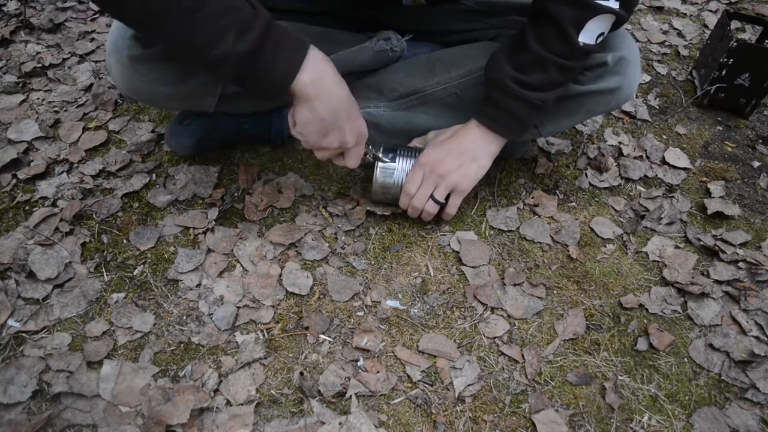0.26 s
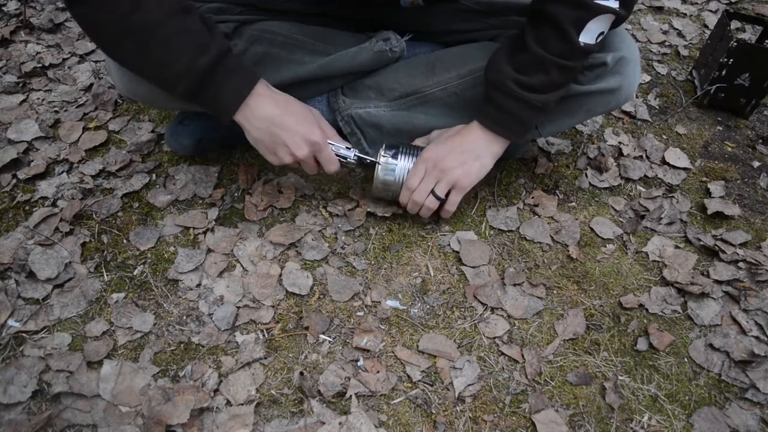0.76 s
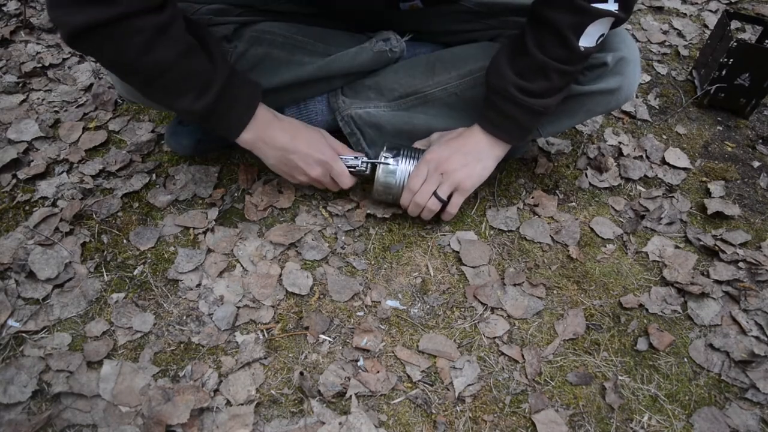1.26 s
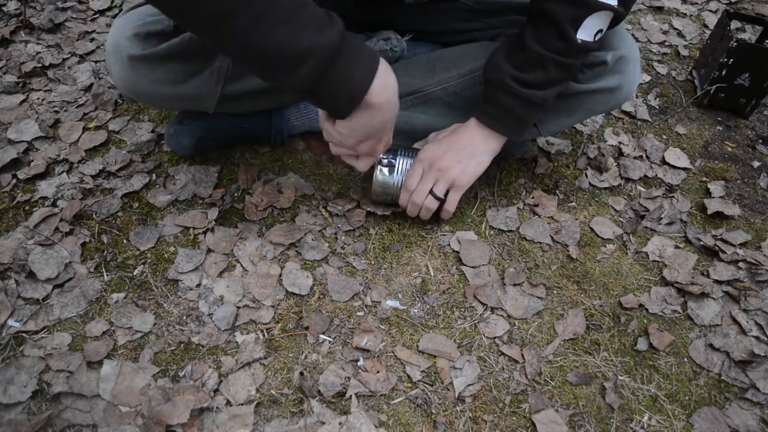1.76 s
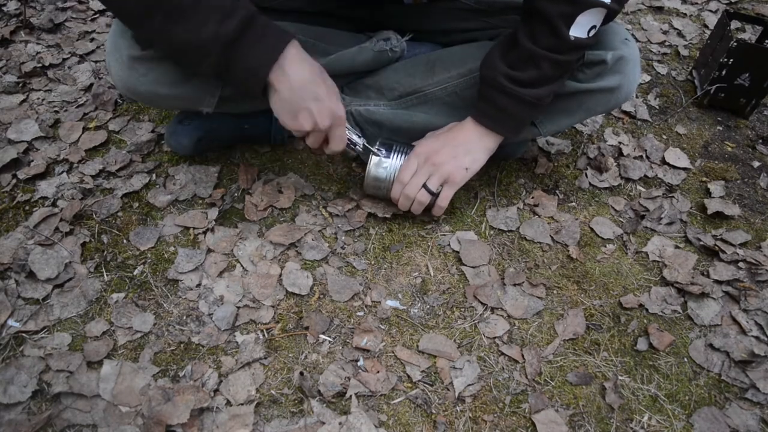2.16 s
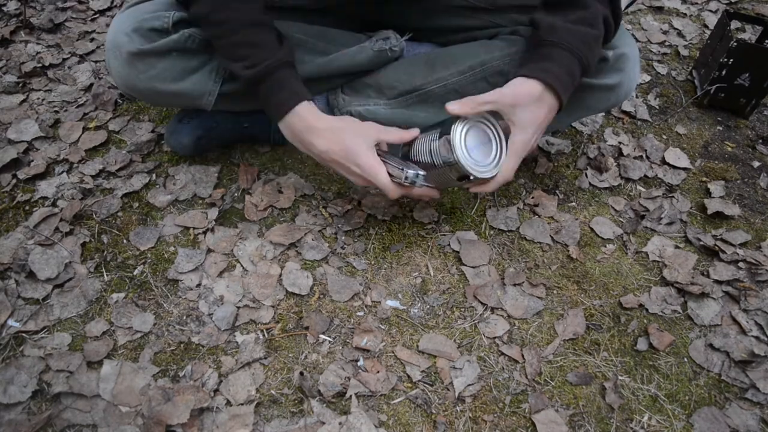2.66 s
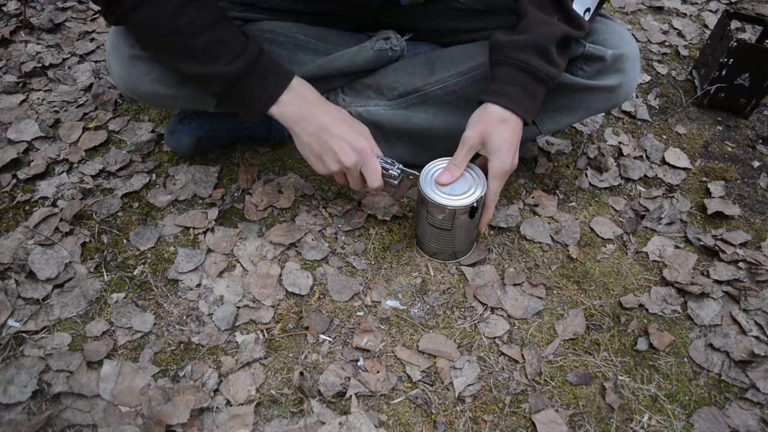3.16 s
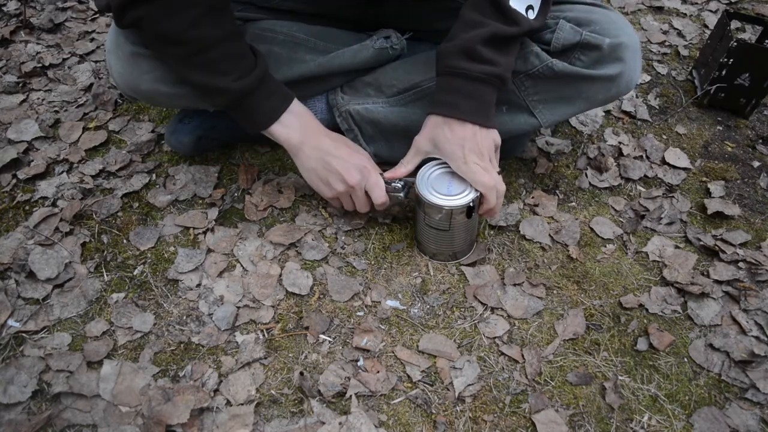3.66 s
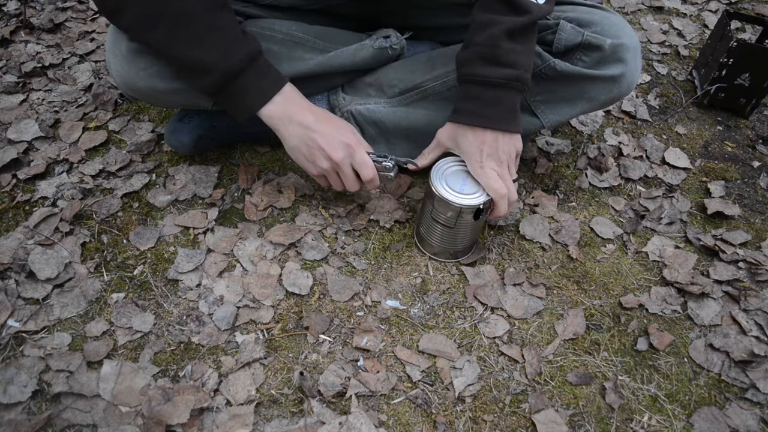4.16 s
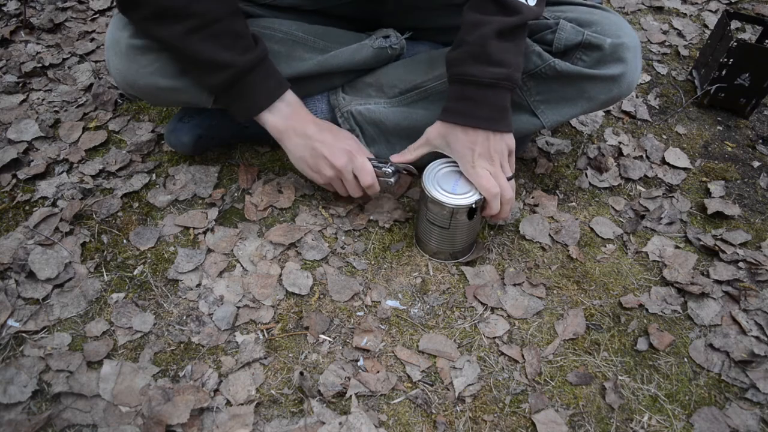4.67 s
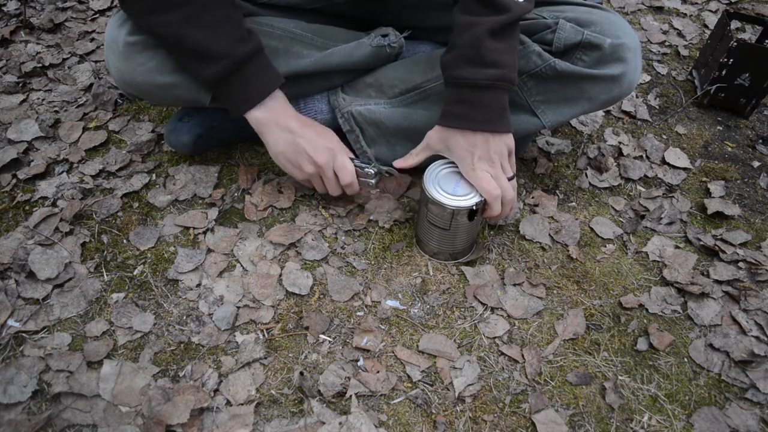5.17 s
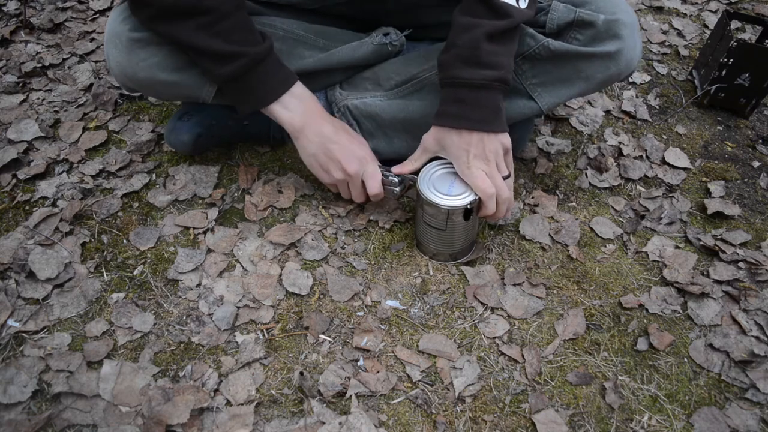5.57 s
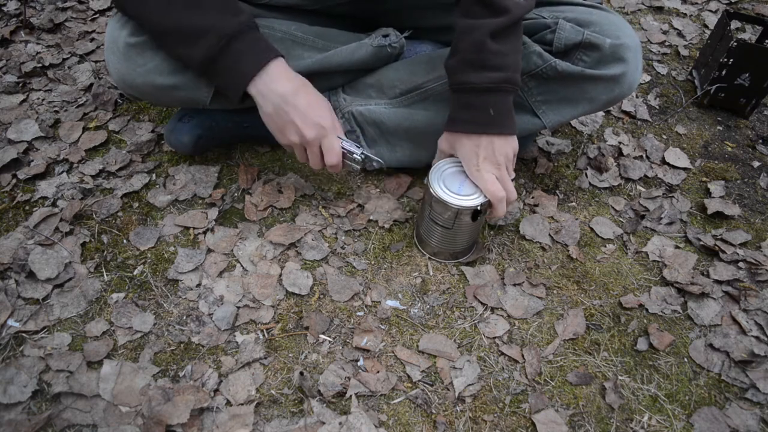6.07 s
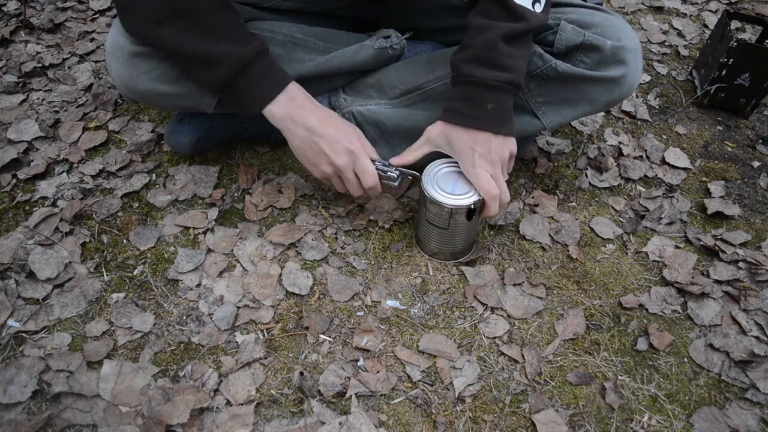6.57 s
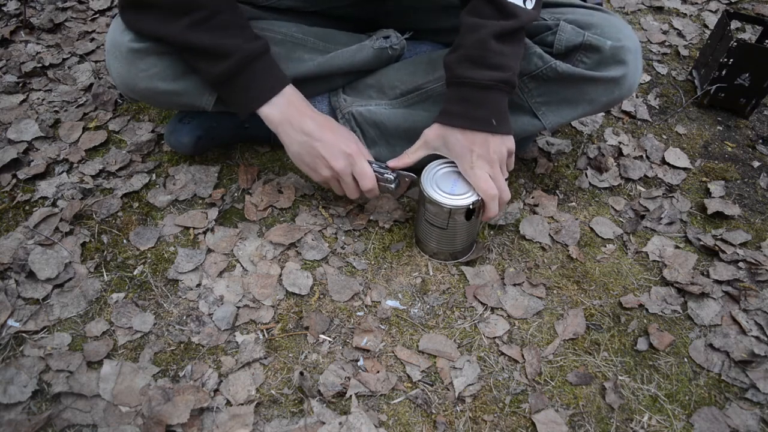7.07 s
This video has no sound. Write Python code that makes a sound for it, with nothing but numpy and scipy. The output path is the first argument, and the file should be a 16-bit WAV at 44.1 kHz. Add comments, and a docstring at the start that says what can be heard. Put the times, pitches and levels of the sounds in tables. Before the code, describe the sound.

Quiet outdoor air and a faint, wavering far engine hum run throughout, close and nearly mono. A blade clicks on a damped tin can at 0.25 s, scrapes lightly around 0.4-0.6, then snaps with short steely rings at 0.63, 0.95 and very hard at 1.62 with a blunt knock. From 1.8 to 2.4 come snaps, ticks and a burst of gritty scratching, strongest near 2.2. Hands rub the metal softly from 2.3 to 2.9 and again at 3.2-3.4. A loud double snap lands at 3.54, then clicks and rasps crowd 4.0-4.65, sharp at 4.5. Sparser clicks follow, with a bright ring at 5.19, a tiny squeak at 5.86, a firm crunchy snap at 5.99, and small clicks and scrapes to 7.25. Very high gliding bird whistles run from 0.4 to 4.3, 5.1 to 5.9, and 6.85 to 7.2.

```python
"""On a forest floor, a pocket tool's blade is worked through a tin can, first lying, then standing.
Each slip of the blade excites the can's damped resonances as a click; scrapes are clumps of tiny slips,
and the freed tool rings in three decaying modes. A tiny bird whistles gliding, very high syllables.
A far engine hums in wavering harmonics under shaped outdoor noise, the lid murmurs, and a squeak and
some low thumps are heard; a limiter ducks the whole after the sharpest snaps."""
import sys
import numpy as np
from scipy import signal
from scipy.fft import rfft, irfft
from scipy.io import wavfile
from scipy.ndimage import map_coordinates

SR = 44100
rng = np.random.default_rng(int(sys.argv[2]) if len(sys.argv) > 2 else 0)


def int16_out(signal):
    """Quantize to a 16-bit WAV file."""
    q = np.round(np.clip(np.atleast_2d(signal).T, -1, 1) * 32767)
    wavfile.write(sys.argv[1], SR, q.astype(np.int16))


N = 322812  # samples

STOOD_UP_S, NEW_GRIP_S = 2.9, 3.6  # the can is stood up; the tool is held in its second grip

# Outdoor noise spectrum. Each row: frequency in Hz, relative spectral level in dB.
AIR_SPECTRUM = [(12, -39), (20, -12), (138, -4.5), (177, -3.5), (241, -3.5), (642, -3), (1060, -3),
                (1190, -4.5), (1400, -1.5), (1860, -4.5), (3530, -6), (9140, -13.5), (11800, -12.5),
                (12800, -14), (16000, -15)]
AIR_DB = -44.22  # mean rms level
# Engine harmonics. Each row: multiple of the fundamental, mean rms level in dB.
HUM_HARMONICS = [(1, -68), (2, -59), (3, -63.5), (5, -63.5), (6, -71), (7, -66), (8, -68)]
HUM_HZ = 95.74  # mean fundamental

# Frequency bands of a contact sound. Each row: lower edge in Hz, upper edge in Hz.
BANDS = [(1050, 1900), (1900, 4400), (5000, 9000), (9000, 17000)]
# Nominal resonances of the hand-damped can, lying. Each row: frequency in Hz, width in Hz, level in dB.
CAN_LYING = [(1560, 310, -7), (3080, 900, -10), (3850, 98, -2), (6580, 900, -20.5), (9100, 99, -27),
             (10420, 270, -2.5), (11900, 910, -1), (14700, 660, -13)]
# The same for the can standing. Each row: frequency in Hz, width in Hz, level in dB.
CAN_STANDING = [(1400, 27, -35), (1464, 130, -3.5), (2490, 380, -12.5), (4000, 205, -6.5), (6570, 60, -6.5),
                (7780, 130, -8.5), (8500, 100, -17), (10350, 180, -21), (10660, 680, -11), (12050, 210, -6),
                (12980, 290, -5.5), (15500, 370, -12)]

# Blade drawn through the tin. Each row: start in seconds, end in seconds, strength in dB, brightness in dB.
STROKES = [(0.362, 0.433, -41, -4), (.415, 0.61, -45.5, 1), (1.849, 1.952, -46.5, 3),
           (2.083, 2.145, -38, 8), (2.137, 2.2, -44, 2), (2.196, 2.254, -31.5, -4.5),
           (2.257, 2.285, -30, -4.5), (2.836, 2.902, -43, 15), (3.113, 3.147, -44.5, 2),
           (3.968, 4.004, -38.5, -0.5), (4.098, 4.134, -32.5, 19), (4.901, 4.958, -44, -7),
           (4.984, 4.998, -40.5, -5.5), (5.642, 5.7, -44.5, -4.5), (6.327, 6.402, -46.5, 6),
           (6.539, 6.62, -49, 3), (6.728, 6.764, -34.5, -3), (7.127, 7.276, -49.5, 0.5)]
# Hands and sleeves on the can. Each row: start in seconds, end in seconds, strength in dB, brightness in dB.
SLIDES = [(0.064, 0.212, -53, -7), (0.792, .87, -54, 7.5), (1.708, 1.818, -47.5, -1),
          (2.335, 2.728, -50.5, 2.5), (2.671, 2.832, -46, 3.5), (3.172, 3.43, -57, 1),
          (3.998, 4.033, -50.5, 13), (6.007, 6.043, -54, 12)]
STROKE_GRIT, SLIDE_GRIT = 0.98, 0.54  # share of tiny slips in the rubbing's energy, 0-1
# Colour of a stroke with the can lying. One value for each of the BANDS, in dB.
STROKE_LYING_DB = (-16.5, 0, -11, -10)
# Colour of a stroke with the can standing. One value for each of the BANDS, in dB.
STROKE_STANDING_DB = (1, -8, -12.5, -4)
# Colour of a hand slide. One value for each of the BANDS, in dB.
SLIDE_DB = (-9, 2, 1, 1)
# A sharp contact favours the treble. One value for each of the BANDS, in dB per dB of brightness.
BRIGHT_LEAN = (-0.51, -0.38, .38, 0.46)

# Blade slips and snaps. Each row: start in seconds, length of the slip in seconds (0.1 ms at least is used),
# wall resonance in Hz, cut edge resonance in Hz, strength in dB, brightness in dB.
CLICKS = [(0.2505, 0.00018, 3090, 11200, -26.5, -1), (0.626, 0.0026, 3820, 10600, -37, -21.5),
          (0.6284, 0.00078, 3930, 10900, -38, 11), (0.953, 0.0006, 3030, 10900, -31.5, -6.5),
          (1.6215, 0.000087, 3740, 9900, -22.5, 1.5), (1.8193, 0.00066, 4240, 7460, -33.5, -9),
          (2.09, 0.00093, 3010.0, 10620.0, -45, -2), (2.1397, 0.00099, 2650, 10800, -26.5, -9),
          (2.238, 0.002, 3880.0, 12320.0, -39.5, -9), (2.2438, 0.0023, 1440, 13110.0, -43.5, -10),
          (2.275, 0.001, 3700, 11600, -30, 0), (2.3513, 0.0005, 2650, 10900, -48, 22),
          (2.383, 0.0006, 2870, 14750.0, -42, 5), (2.5343, 0.001, 3270, 10000, -30, 9),
          (3.0988, 0.0001, 1750, 11300, -39.5, 4), (3.135, 0.00058, 1450, 11630.0, -46.5, 1),
          (3.299, 0.0032, 1810.0, 8420.0, -48, -4), (3.542, 0.00042, 3900, 8600, -29.5, -26),
          (3.5455, 0.00063, 3840, 13400, -21.5, 4.5), (3.995, 0.00018, 4370, 12450.0, -29.5, 10),
          (4.109, 0.009, 3850.0, 12470.0, -33, 0), (4.1208, 0.0052, 1640.0, 12400.0, -37, 5.5),
          (4.289, 0.0019, 1560, 12900.0, -46.5, 5), (4.3389, 0.00021, 1620, 13200, -35.5, 0.5),
          (4.494, 0.00012, 1300, 11800, -24.5, -7), (4.4977, 0.00033, 1260, 12730.0, -38, -12),
          (4.505, 0.0004, 1390, 13480.0, -33.5, -4), (4.5446, 0.00011, 1420.0, 12470.0, -40, 4.5),
          (4.6372, 0.011, 1360.0, 12700, -32.5, 14.5), (4.646, 0.0044, 1400.0, 13300, -41, 13),
          (4.814, 0.00022, 1480, 13460.0, -45, -6), (4.9297, 0.00037, 1470, 11600, -44, -10),
          (5.182, 0.0069, 1280, 13460.0, -35, 1.5), (5.1903, 0.0026, 1380, 7970, -31.5, 10.5),
          (5.371, 0.0012, 1380.0, 11600, -51.5, 18), (5.4577, 0.00092, 1470, 7840.0, -49, -26),
          (5.6895, 0.0066, 1510, 11800, -44, -3), (5.9873, 0.0073, 1470, 13500.0, -27, 3.5),
          (6.2604, 0.0019, 1370, 8100, -44, -4), (6.3356, 0.00064, 1610, 12470.0, -51, -14),
          (6.3574, 0.0054, 1540, 13260.0, -50, -19), (6.4277, 0.00023, 1690, 11400, -36.5, 13.5),
          (6.431, 0.00075, 1680.0, 8000, -40, 16), (6.6825, 0.00028, 1490, 11500, -32, -7.5),
          (6.7543, 0.0057, 1450, 11520.0, -33.5, -8.5), (6.9659, 0.0084, 1470, 11100, -33, 0.5),
          (6.974, 0.0062, 1520, 6860, -39.5, 4), (7.099, 0.0017, 1370, 12200, -45.5, 8),
          (7.1099, 0.0071, 1320, 13350.0, -46.5, -1), (7.1545, 0.002, 1510, 11260.0, -51.5, -6),
          (7.252, 0.0044, 1410, 14470.0, -53.5, -12)]
# Colour of an ordinary snap on the slack wall. One value for each of the BANDS, in dB.
SNAP_DB = (4, -.5, -8, 2)
# Added where the wall is stiff and rings high. One value for each of the BANDS, in dB.
STIFF_WALL_DB = (-16, 4.5, 3.5, -1)
# Added where a long cut edge rings low. One value for each of the BANDS, in dB.
LONG_EDGE_DB = (-6, -6.5, 8.5, -1.5)
# Change of colour with strength. One value for each of the BANDS, in dB per dB above USUAL_SNAP_DB.
FORCE_LEAN = (-0.19, -0.14, 0.07, -0.041)
USUAL_SNAP_DB = -33.5
# Light ticks of the blade's point. Each row: start in seconds, level in dB before TICK_GAIN_DB.
TICKS = [(0.3022, -36), (0.3536, -35), (0.5057, -37), (0.5385, -29.5), (1.4357, -36), (1.468, -33.5),
         (1.5253, -35), (1.534, -30), (1.8963, -26.5), (1.99, -32), (2.0167, -32), (2.0944, -22),
         (2.4144, -28.5), (2.8744, -33.5), (4.786, -36), (5.657, -28.5), (6.548, -32), (6.577, -32.5)]
TICK_GAIN_DB, TICK_BRIGHT_DB = -20.5, -4.5
TICK_SLIP_S, TICK_EDGE_HZ = 0.0014, 13000
TICK_LYING_HZ, TICK_STANDING_HZ = 3490, 1430  # wall resonance with the can lying or standing

# Bird syllables, by name, as chains of glides. Each row: time from the start in seconds, frequency in Hz.
SYLLABLES = { "slur": [(0, 13600), (.014, 13950), (.023, 13200), (.031, 11400), (.033, 9450), (.053, 9600),
             (.065, 10000), (.085, 10200)], "zigzag": [(0, 9700), (.013, 8200), (.018, 9700), (.029, 9000),
             (.04, 11200), (.051, 9200), (.068, 7800)], "hook": [(0, 9400), (.01, 10400), (.022, 9700)],
             "pip": [(0, 11200), (.012, 12100), (.024, 11400), (.036, 12000)], "rise": [(0, 11300),
             (.027, 14900)], "dip": [(0, 12400), (.014, 9800), (.027, 8700), (.05, 10000)],
             "arch": [(0, 8900), (.014, 11000), (.026, 11700), (.048, 9400)], "double": [(0, 10200),
             (.006, 11300), (.016, 9200), (.025, 11400), (.046, 7700)], }
# Bird calls. Each row: start in seconds, rms level in dB, name of the syllable.
BIRD_CALLS = [ (.42, -60, "pip"), (0.551, -47, "hook"), (0.676, -46, "slur"), (0.838, -48, "zigzag"),
              (1.018, -45, "hook"), (1.073, -44.5, "hook"), (1.249, -47.5, "pip"), (1.529, -46.5, "zigzag"),
              (1.674, -42, "slur"), (1.839, -44.5, "zigzag"), (1.983, -46, "rise"), (2.311, -49, "zigzag"),
              (2.598, -43.5, "dip"), (2.752, -43, "double"), (2.888, -43, "rise"), (3.175, -42.5, "double"),
              (3.296, -42, "zigzag"), (3.438, -42, "rise"), (3.678, -39.5, "double"), (3.802, -42, "dip"),
              (3.922, -45, "rise"), (4.084, -38, "double"), (4.272, -42, "rise"), (5.109, -47, "arch"),
              (5.249, -44.5, "arch"), (5.386, -40.5, "zigzag"), (5.56, -42, "hook"), (5.68, -41.5, "pip"),
              (5.727, -38.5, "dip"), (5.895, -46, "arch"), (6.852, -41, "slur"), (7.02, -40.5, "zigzag"),
              (7.17, -45, "pip"), ]

# Blade springing free. Each row: start in seconds, level in dB, extra swing of the lowest mode in dB.
RINGS = [(.629, -32, -1), (.954, -28, -8), (1.622, -22.5, -2), (2.14, -29, -1), (2.275, -42, -4),
         (2.3513, -49.5, 25.5), (3.546, -35, 7), (4.646, -30.5, 2.5), (5.192, -22.5, -9), (5.994, -47, 17),
         (6.3585, -40, -3), (6.9745, -32.5, -2), (7.1106, -39, -7), (7.252, -54, -7)]
# Free modes of the steel tool in the first grip. Each row: frequency in Hz, 60 dB decay time in seconds.
RING_LYING = [(2600, 0.19), (6697, 0.05), (13190, 0.086)]
# The same in the second grip. Each row: frequency in Hz, 60 dB decay time in seconds.
RING_STANDING = [(3488, 0.087), (6309, 0.086), (6546, 0.12)]
# Mode shares in the first grip. One value for each mode, in dB.
RING_LYING_DB = (-11.5, 4, -7)
# Mode shares in the second grip. One value for each mode, in dB.
RING_STANDING_DB = (-5, -13, 0.5)
# In the second grip a hard release wakes the middle mode. One value for each mode, in dB per dB
# above USUAL_RING_DB.
WAKE = (0, 1, -0.11)
USUAL_RING_DB = -38

# Fingers dragging over the lid. Each row: start in seconds, end in seconds, rms level in dB.
LID_RUBS = [(.7, .89, -50.5), (2.52, 2.9, -49), (3.169, 3.442, -49.5)]
# Low thumps, some under hard snaps. Each row: start in seconds, frequency in Hz, decay to 1/e in seconds,
# level in dB.
THUMPS = [(1.6216, 60, 0.00009, -0.5), (2.139, 910, 0.00052, -16.5), (3.5419, 60, 0.00013, -16.5),
          (3.978, 720, 0.0015, -25), (4.4975, 422, 0.0028, -25.5)]
# Faint stereo width by frequency. Each row: frequency in Hz, level in dB.
STEREO_SIDE = [(60, -18), (150, -33.5), (380, -20.5), (950, -31), (2380, -66.5), (5980, -46.5),
               (15000, -32.5)]


def amp(db):
    """Amplitude gain of a level in decibels."""
    return 10 ** (np.asarray(db) / 20)


def evened(x):
    """Normalisation to unit rms."""
    return x / np.sqrt(np.mean(x ** 2) + 1e-20)


def add(mix, s, sound):
    """Superposition: a sound is summed into the mix from time s on."""
    part = mix[max(round(s * SR), 0):][:len(sound)]
    part += sound[:len(part)]


def drift(rate, size):
    """Slow random modulation: a spline through normal deviates, rate of them per second."""
    t = np.arange(size) / SR
    knots = rng.standard_normal(int(size / SR * rate) + 4)
    return map_coordinates(knots, [t * rate + 1], order=2, mode="nearest")


def spectrum_gain(table):
    """Frequency response: levels in dB interpolated along log frequency."""
    hz, db = np.transpose(table)
    log_hz = np.log(np.fft.rfftfreq(N, 1 / SR) + 1)
    return amp(np.interp(log_hz, np.log(hz), db))


def struck(modes, t):
    """Impulse response of damped resonators: a wider resonance decays faster."""
    return sum(amp(db) * w * np.exp(-np.pi * w * t) * np.sin(2 * np.pi * hz * t) for hz, w, db in modes)


def coloured(x, levels_db):
    """Spectral distribution: the contact's place and hardness set how much goes into each band."""
    out = 0
    for band, db in zip(BANDS, levels_db):
        band_pass = signal.butter(4, band, "band", fs=SR, output="sos")
        out = out + amp(db) * evened(signal.sosfilt(band_pass, x))
    return out


def can_response(s, extra=(), spread=0.054, shell_db=-6, shell_s=0.0014):
    """Modal response of a shell: main resonances over a dense wash of quickly dying modes."""
    t = np.arange(SR // 50) / SR
    modes = CAN_LYING if s < STOOD_UP_S else CAN_STANDING
    # the grip shifts each resonance by up to the share spread
    modes = [(hz * (1 + spread * rng.uniform(-1.0, 1)), w, db) for hz, w, db in modes] + list(extra)
    shell = rng.standard_normal(len(t)) * np.exp(-t / shell_s)
    return evened(struck(modes, t)) + amp(shell_db) * evened(shell)


def outdoors(swell_db=-0.5):
    """Broadband noise: white noise shaped in frequency, its level swelling slightly."""
    noise = irfft(rfft(rng.standard_normal(N)) * spectrum_gain(AIR_SPECTRUM), N)
    return amp(AIR_DB + swell_db * drift(3.35, N)) * evened(noise)


def far_engine(waver=0.00496, fading_db=1.5):
    """Harmonic series: multiples of one wavering fundamental fade in and out on their way."""
    turns = np.cumsum(HUM_HZ * (1 + waver * drift(4, N))) / SR
    out = np.zeros(N)
    for multiple, db in HUM_HARMONICS:
        level = np.sqrt(2) * amp(db + fading_db * drift(5, N))  # root 2 turns rms into peak
        out += level * np.sin(2 * np.pi * (round(multiple) * turns + rng.random()))
    return out


def rubs():
    """Friction contacts: strokes are gritty and coloured by how the can stands, slides are smoother."""
    contacts = []
    for row in STROKES:
        contacts.append((*row, STROKE_GRIT, STROKE_LYING_DB if row[0] < STOOD_UP_S else STROKE_STANDING_DB))
    for row in SLIDES:
        contacts.append((*row, SLIDE_GRIT, SLIDE_DB))
    return [(start, end, grit, db + np.array(colour_db) + bright_db * np.array(BRIGHT_LEAN))
            for start, end, db, bright_db, grit, colour_db in contacts]


def scrapes(grains_per_s=4000, firm_db=-35, rate_follow=1.1, size_db=4, judder_db=3, judder_rate=130,
            swish_db=1.3):
    """Stick-slip friction: clumped tiny slips ring the can, mixed with a soft, uneven swish."""
    out = np.zeros(N)
    for start, end, grit, levels_db in rubs():
        n = int((end - start) * SR)
        # a light touch gives separate ticks
        rate = max(grains_per_s * amp(rate_follow * (max(levels_db) - firm_db)), 200)
        slips = (rng.random(n) < rate / SR) * rng.choice([-1, 1], n)
        slip_size_db = size_db * np.minimum(rng.exponential(1, n), 3)
        force = slips * amp(slip_size_db + judder_db * np.tanh(drift(judder_rate, n)))
        catching = evened(signal.fftconvolve(force, can_response(start))[:n])
        swish = evened(rng.standard_normal(n) * amp(swish_db * drift(218, n)))
        rubbing = np.sqrt(grit) * catching + np.sqrt(1 - grit) * swish
        add(out, start, coloured(rubbing * signal.windows.tukey(n, .4), levels_db))
    return out


def light_ticks():
    """Repeated equal excitation: all ticks share one slip length, and the can's stance sets the wall pitch."""
    rows = []
    for s, db in TICKS:
        wall_hz = TICK_LYING_HZ if s < STOOD_UP_S else TICK_STANDING_HZ
        rows.append((s, TICK_SLIP_S, wall_hz, TICK_EDGE_HZ, db + TICK_GAIN_DB, TICK_BRIGHT_DB))
    return rows


def snap_colour(wall_hz, edge_hz, db, bright_db):
    """Contact spectrum: band levels follow from a snap's strength, sharpness and place on the can."""
    stiff, long_edge = wall_hz > BANDS[1][0], edge_hz < BANDS[3][0]
    place_db = stiff * np.array(STIFF_WALL_DB) + long_edge * np.array(LONG_EDGE_DB)
    sharpness_db = bright_db * np.array(BRIGHT_LEAN)
    force_db = (db - USUAL_SNAP_DB) * np.array(FORCE_LEAN)
    return db + np.array(SNAP_DB) + place_db + sharpness_db + force_db


def clicks(wall_width=300, wall_db=1, edge_width=260, edge_db=-5, grit_db=-3):
    """Impulsive excitation: one sharp snap and a gritty slide drive the resonances (widths in Hz)."""
    out, t = np.zeros(N), np.arange(SR // 50) / SR
    for s, slip_s, wall_hz, edge_hz, db, bright_db in list(CLICKS) + light_ticks():
        slip_s = max(slip_s, 1e-4)
        grit = rng.standard_normal(len(t)) * np.exp(-(t / slip_s) ** 2)
        # longer slips are more grit than snap
        force = amp(grit_db) * np.sqrt(slip_s / 0.0042) * grit / np.linalg.norm(grit)
        force[0] += 1
        body = can_response(s, [(wall_hz, wall_width, wall_db), (edge_hz, edge_width, edge_db)])
        snap = signal.fftconvolve(force, body)[:len(t)]
        add(out, s, coloured(snap, snap_colour(wall_hz, edge_hz, db, bright_db)))
    return out


def bird(waver=0.015, flutter_db=5.0, woods_db=-6, woods_t60=0.28, second_ratio=1.22, second_db=-13):
    """Frequency modulation: gliding whistles with a faint second voice above, scattered by the trees."""
    out = np.zeros(N)
    for s, db, name in BIRD_CALLS:
        at, hz = np.transpose(SYLLABLES[name])
        t = np.arange(0, at[-1], 1 / SR)
        pitch = np.interp(t, at, hz) * (1 + waver * drift(375, len(t)))
        swell = signal.windows.tukey(len(t), .4) * amp(flutter_db * drift(191, len(t)))
        phase = 2 * np.pi * np.cumsum(pitch) / SR
        voices = np.sin(phase) + amp(second_db) * np.sin(second_ratio * phase)
        add(out, s, amp(db) * evened(swell * voices))
    t = np.arange(SR // 3) / SR
    woods = rng.standard_normal(len(t)) * amp(-60 * t / woods_t60)
    scattered = signal.fftconvolve(out, woods / np.linalg.norm(woods))[:N]
    return out + amp(woods_db) * scattered


def blade_ring():
    """Free vibration: when the blade springs free, the tool's modes decay exponentially."""
    out, t = np.zeros(N), np.arange(SR // 6) / SR
    for s, ring_db, low_db in RINGS:
        modes, shares_db = RING_LYING, np.array(RING_LYING_DB)
        if s > NEW_GRIP_S:
            modes = RING_STANDING
            shares_db = np.array(RING_STANDING_DB) + (ring_db - USUAL_RING_DB) * np.array(WAKE)
        shares_db = [shares_db[0] + low_db, *shares_db[1:]]
        for (hz, t60), db in zip(modes, shares_db):
            add(out, s, amp(ring_db + db - 60 * t / t60) * np.sin(2 * np.pi * hz * t))
    return out


def lid(hz=1430, width=260, uneven_db=4.0, uneven_rate=35):
    """Resonance under random forcing: dragging skin keeps the lid's main mode sounding softly."""
    out, t = np.zeros(N), np.arange(SR // 50) / SR
    for start, end, db in LID_RUBS:
        n = int((end - start) * SR)
        unevenness = amp(uneven_db * drift(uneven_rate, n))
        drag = rng.standard_normal(n) * unevenness * signal.windows.tukey(n, .4)
        murmur = signal.fftconvolve(drag, struck([(hz, width, 0)], t))[:n]
        add(out, start, amp(db) * evened(murmur))
    return out


def thumps():
    """Heavy damping: each low thump dies at once."""
    out, t = np.zeros(N), np.arange(SR // 30) / SR
    for s, hz, decay_s, db in THUMPS:
        add(out, s, amp(db) * np.exp(-t / decay_s) * np.cos(2 * np.pi * hz * t))
    return out


def squeak(s=5.858, length_s=0.031, tones=((3680, -46), (6120, -50)), waver=0.013):
    """Common frequency modulation: two faint, short tones (Hz, dB) waver together."""
    out, n = np.zeros(N), int(length_s * SR)
    turns = np.cumsum(1 + waver * drift(280, n)) / SR
    voices = sum(amp(db) * evened(np.sin(2 * np.pi * hz * turns)) for hz, db in tones)
    add(out, s, signal.windows.tukey(n, .5) * voices)
    return out


def scene():
    """Stereo width: a faint quarter-turned copy is added left and subtracted right."""
    mix = outdoors() + far_engine() + scrapes() + clicks() + bird() + blade_ring() + lid() + thumps() + squeak()
    side = irfft(1j * rfft(mix) * spectrum_gain(STEREO_SIDE), N)  # 1j: a quarter turn of phase
    return np.array([mix + side, mix - side])


def record(dry, limit_db=-5.0, recovery_db_per_s=130, attack_s=0.00056, edge_hz=16050):
    """Peak limiting: gain ducks after the hardest snaps, what slips past clips; then a low-pass."""
    peak_db = 20 * np.log10(abs(dry).max(0) + 1e-9)
    fall = np.arange(N) * recovery_db_per_s / SR
    held_peak_db = np.maximum.accumulate(peak_db + fall) - fall
    over_db = np.maximum(held_peak_db - limit_db, 0)
    r = np.exp(-1 / (attack_s * SR))
    reduction_db = signal.lfilter([1 - r], [1, -r], over_db)
    limited = np.clip(dry / amp(reduction_db), -1, 1)
    low_pass = signal.firwin(255, edge_hz, window=("kaiser", 8), fs=SR)
    return signal.oaconvolve(limited, low_pass[None], "same")


dry = scene()
out = record(dry)
int16_out(out)
```